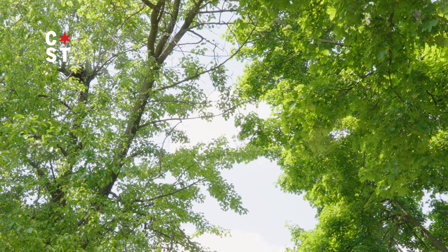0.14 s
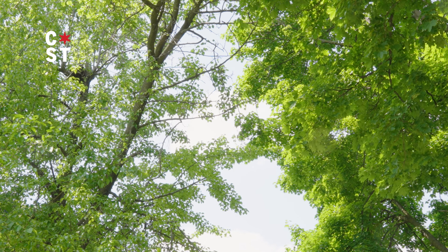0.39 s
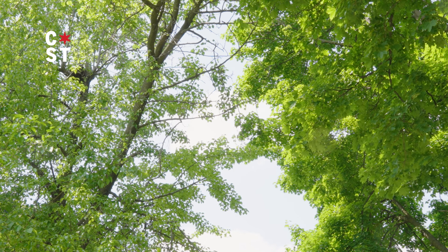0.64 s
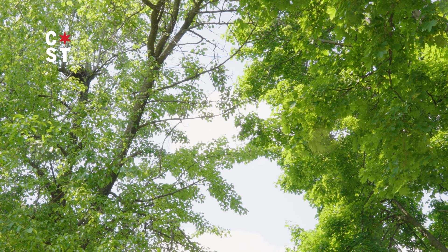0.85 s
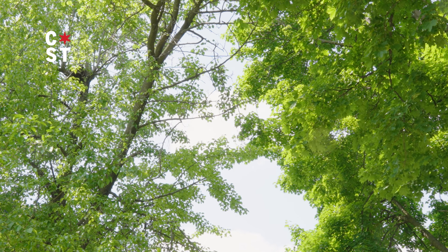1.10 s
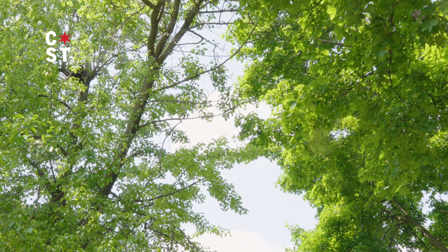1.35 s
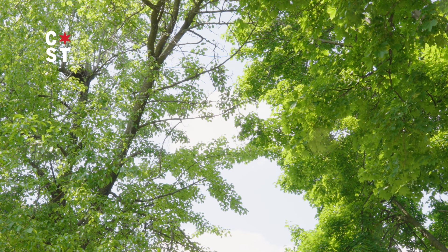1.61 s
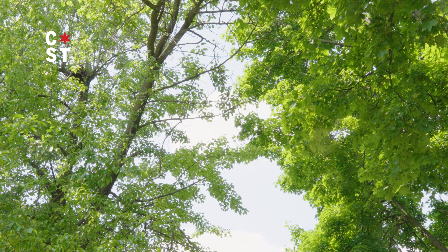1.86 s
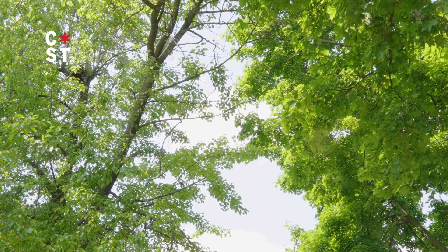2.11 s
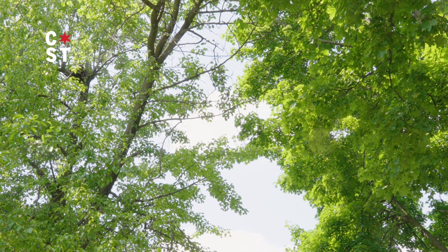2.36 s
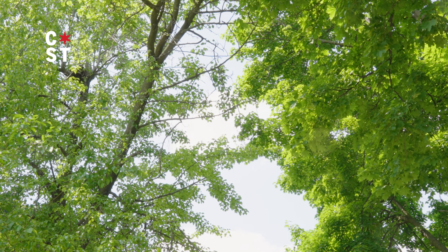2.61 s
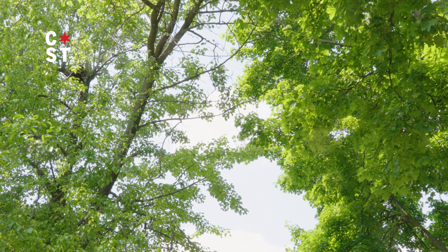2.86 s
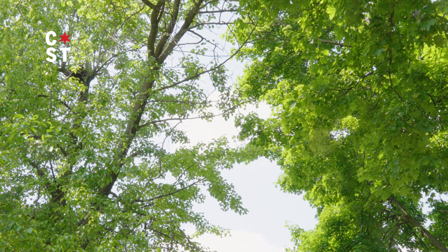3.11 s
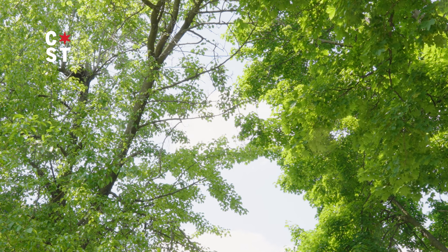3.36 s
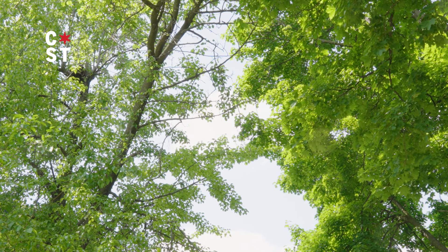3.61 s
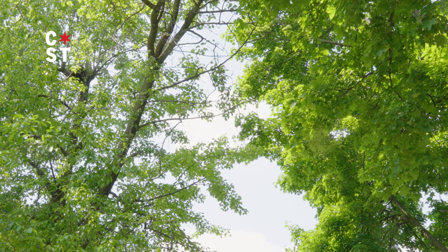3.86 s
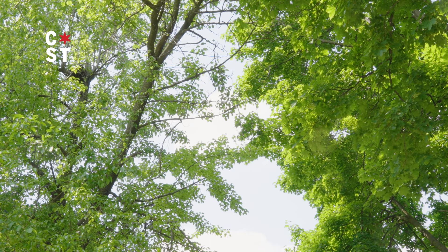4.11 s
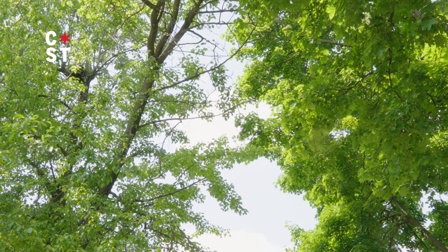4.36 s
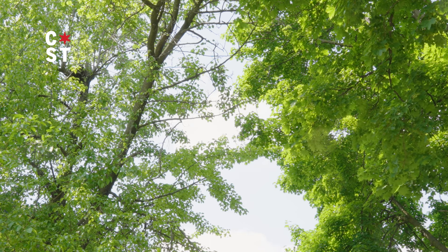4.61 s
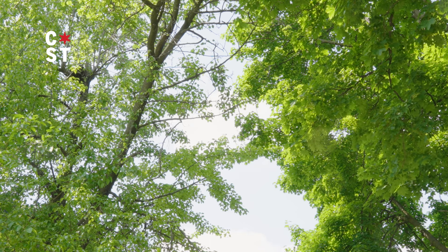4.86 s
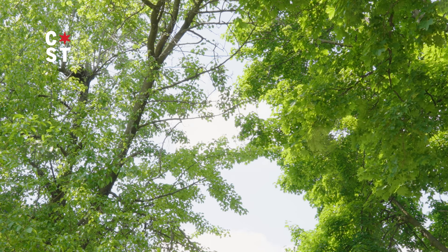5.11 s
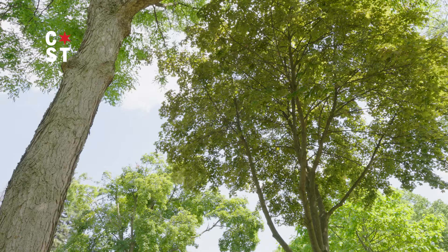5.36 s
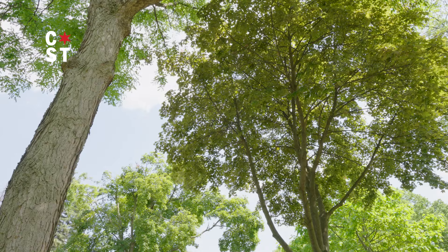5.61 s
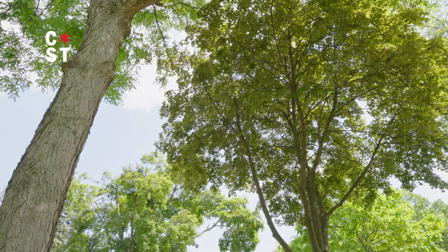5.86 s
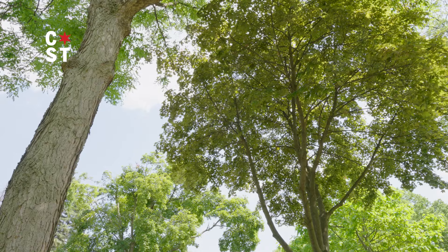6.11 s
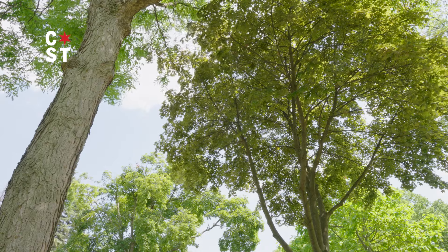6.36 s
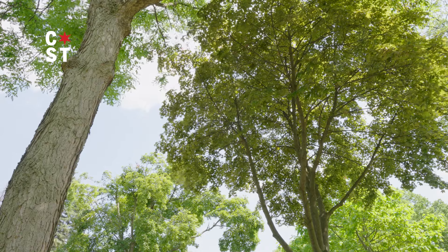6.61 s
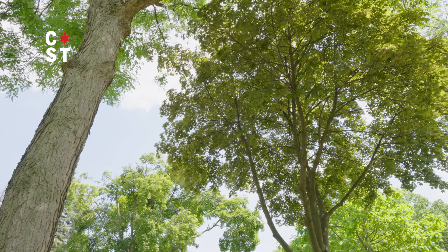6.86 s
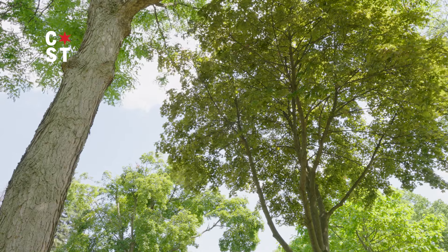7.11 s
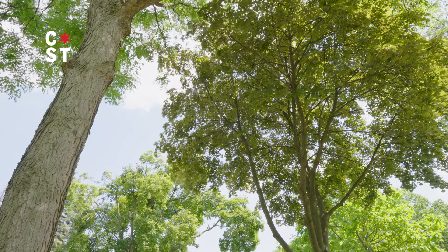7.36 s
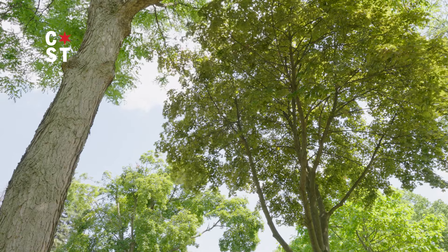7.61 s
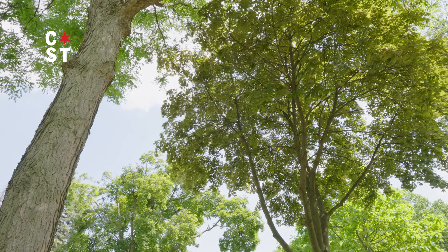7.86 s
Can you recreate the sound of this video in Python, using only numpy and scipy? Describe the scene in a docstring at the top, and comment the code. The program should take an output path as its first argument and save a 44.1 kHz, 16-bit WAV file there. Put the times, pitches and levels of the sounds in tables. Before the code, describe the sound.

A dense, high cicada chorus buzzes continuously from leafy treetops over a lower wavering whine and faint traffic, then cuts to a breezier spot with bird notes.

```python
"""Dense cicada chorus in treetops

Two spots are joined by a cut at 5.2 s, through one microphone. 144 clicking singers blur into a
swelling buzz; a second species whines lower down as narrow noise and wavering tones.
Behind are filtered-noise traffic, a hum, sine-wave engines, gliding bird notes and bright ticks.
The second spot adds low-noise gusts and soft thumps of wind on the microphone."""
import sys
import numpy as np
from scipy import signal
from scipy.fft import rfft, irfft
from scipy.io import wavfile
from scipy.ndimage import uniform_filter1d

SR = 44100
rng = np.random.default_rng(int(sys.argv[2]) if len(sys.argv) > 2 else 0)


def persist_wave(psi):
    """Save psi, clipped to +-1, as 16-bit WAV."""
    counts = np.round(np.clip(psi, -1, 1) * 32767).astype(np.int16)
    wavfile.write(sys.argv[1], SR, np.atleast_2d(counts).T)


def voltage_ratio(level):
    """Linear amplitude factor for a level in decibels (scalar or array-like)."""
    return 10 ** (np.asarray(level, float) / 20)


N = 352800
TIME_S = np.arange(N) / SR

CUT_S, FADE_OUT_S, FADE_IN_S = 5.2075, 0.00087, 0.02

# Far wash spectrum. Each row: frequency in Hz, relative density in dB per Hz.
WASH_SPECTRUM = [(18, -35), (30, -19), (55, -6.5), (100, -4.5), (200, -8.5), (300, -15.5), (1000, -19.5),
                 (1700, -25), (2600, -35.5), (5000, -50)]
# Far traffic and leaves. Each row: time in seconds, rms level at 283-1030 Hz in dB.
WASH_LEVEL = [(0, -59.2), (1, -58), (2, -56), (2.5, -55), (3, -57.5), (4.5, -60.5), (5.2, -58.5),
              (5.22, -56), (8, -54.5)]
# Hum partials. Each row: frequency in Hz, peak level in dB, rms wander in Hz.
HUM_PARTIALS = [(124.6, -61, 3), (240, -63, 0.57), (380, -70, 2.03)]
# Short drones of far engines. Each row: start and end in seconds, start and end pitch in Hz, rms level in dB.
ENGINE_DRONES = [(3.45, 3.75, 119.9, 125.7, -53), (5.55, 5.85, 132, 127, -52),
                 (5.95, 6.5, 126.8, 128.3, -54.5), (6, 7.1, 183.8, 190.3, -58), (7.7, 8, 195.7, 200, -59)]
# Passing engine. Each row: time in seconds, firing rate in Hz.
ENGINE_FIRING = [(3.66, 82.6), (3.8, 84.2), (3.9, 88.4), (4.2, 89.5), (5.2, 87)]
FIRING_DB, OCTAVE_DB, ARRIVE_S, REV_DB = -51.5, -60, 0.087, 2.5  # REV_DB adds to FIRING_DB while it revs up

# Wind noise spectrum. Each row: frequency in Hz, relative density in dB per Hz.
WIND_SPECTRUM = [(15, -30), (28, -3), (60, -1), (125, 0), (200, -6.5), (270, -13.5), (400, -25), (800, -70)]
# Gusts over the breeze. Each row: peak time in seconds, level in dB, half length to 1/e in seconds.
WIND_GUSTS = [(5.44, -47, .13), (5.77, -45, 0.11), (6.07, -47, 0.062), (6.27, -50, 0.062),
              (7.33, -45.5, .1), (7.64, -48, 0.066), (7.95, -49, 0.089)]
# Single buffets on the microphone. Each row: time in seconds, peak level in dB, frequency in Hz.
WIND_THUMPS = [(5.318, -37.5, 80), (5.426, -36, 110), (5.465, -37, 140), (5.625, -36, 140),
               (5.756, -37, 60), (6.24, -38, 90), (7.246, -33, 70), (7.268, -27, 105), (7.338, -36, 70),
               (7.616, -33, 120)]
BREEZE_DB, THUMP_HALF_S = -55, 0.01

# Small ticks close by. Each row: time in seconds, level in dB, centre in Hz, pole width in Hz,
# full length to 1/e in seconds.
CLOSE_TICKS = [(6.369, -35, 15000, 2500, .0025), (7.685, -46, 12500, 6000, .045),
               (7.916, -42, 13000, 5000, .014)]

# Distant whistles. Each row: start and end in seconds, start and end pitch in Hz, rms level in dB.
BIRD_NOTES = [(.47, .57, 2180, 2160, -66), (5.215, 5.28, 2560, 2500, -58), (5.26, 5.33, 2520, 2200, -60),
              (5.78, 5.85, 3150, 2800, -58), (5.84, 5.88, 2800, 2330, -59), (5.865, 5.925, 2340, 2280, -59),
              (6.44, 6.54, 2400, 2395, -59), (6.53, 6.61, 2405, 2400, -66), (6.522, 6.59, 2000, 1900, -58),
              (6.6, 6.645, 2850, 2700, -61), (6.64, 6.735, 2685, 2700, -55), (6.72, 6.89, 2320, 2390, -63)]
# Short arched chips. Each row: start in seconds, top pitch in Hz, rms level in dB.
BIRD_CHIPS = [(5.238, 2080, -61), (5.765, 2640, -55), (6.355, 2310, -57)]
CHIP_S, CHIP_RISE_HZ, CHIP_FALL_HZ = .055, 110, 190

# Low species as a mass. Each row: time in seconds, rms level in dB.
WHINE_LEVEL = [(0, -56.5), (.4, -58), (1.4, -52.5), (3.4, -54.5), (4.4, -58.5), (5, -55.5), (5.6, -58),
               (6.6, -55.5), (8, -54)]
# Nearer low singers. Each row: start and end in seconds, start and end pitch in Hz, rms level in dB.
WHINE_SOLOS = [(0, .95, 1348, 1355, -59), (.68, .9, 1270, 1320, -60), (1.05, 1.5, 1310, 1300, -59),
               (1.9, 3.45, 1330, 1355, -57), (3.4, 4.1, 1358, 1358, -60), (2.1, 3.5, 1295, 1275, -63),
               (.75, 3.5, 1158, 1172, -65), (0, 3.5, 1482, 1508, -68), (3.9, 4.7, 1398, 1402, -67),
               (4.62, 5.2, 1285, 1310, -62), (4.7, 5.2, 1152, 1172, -67), (5.45, 6.2, 1320, 1312, -58),
               (6.25, 6.75, 1310, 1305, -61), (6.75, 8, 1378, 1400, -59), (7.6, 8, 1310, 1290, -61)]

# Colour of one tymbal click. Each row: frequency in Hz at body size 1, relative density in dB per Hz.
CLICK_SPECTRUM = [(1180, -71), (2000, -42.5), (2820, -30.5), (3810, -10.5), (4680, -10.5), (5370, -2.5),
                  (5760, 0), (6220, -3), (7320, -18), (8400, -20.5), (9640, -33), (12000, -30.5),
                  (14700, -36.5), (15600, -36)]
# Chorus effort, one list a spot. Each row: time in seconds, level in dB.
CHORUS_EFFORT = [
    [(0, -25), (.3, -26.5), (.7, -27), (1.05, -25.5), (1.55, -26), (2.2, -24), (2.65, -22.2), (3.35, -22),
     (3.7, -21), (4.0, -21.4), (4.6, -24.5), (5.2, -27.5)],
    [(5.23, -23.5), (5.6, -23), (5.82, -24.5), (6.15, -22.5), (6.5, -23), (7.0, -23), (7.6, -23.5),
     (8, -25)],
]
# Low shoulder at the usual effort. Each row: time in seconds, lift in dB.
SHOULDER_LIFT = [(0, -1), (.9, -1.5), (1.3, -2.5), (2.3, -1), (3.2, -1.8), (4.5, -1), (5.2, -1.5),
                 (5.22, .5), (6.5, 1), (7.1, -1), (8, -1)]
# High sheen at the usual effort. One value a spot: lift in dB.
SHEEN_LIFT_DB = (-.2, -1.1)
USUAL_EFFORT_DB = -24
SHOULDER_LAG, SHEEN_LAG = 0.46, .1  # share of each swell not followed


def evened(x):
    """Scales to rms 1."""
    return x / np.sqrt(np.mean(abs(x) ** 2) + 1e-20)


def read_spectrum(points, hz):
    """Reads a spectrum in dB on a log-frequency axis."""
    points_hz, points_db = np.transpose(points)
    return np.interp(np.log(hz + 1), np.log(points_hz + 1), points_db)


def curve(rows, t_s=TIME_S):
    """Interpolates a two-column table at the given times."""
    rows_s, values = np.transpose(rows)
    return np.interp(t_s, rows_s, values)


def drift(seconds):
    """Slow random curve of rms 1: noise averaged twice over the given span."""
    size = max(int(seconds * SR), 2)
    once = uniform_filter1d(rng.standard_normal(N), size, mode="wrap")
    return evened(uniform_filter1d(once, size, mode="wrap"))


def coloured(x, points):
    """Filters x by a fixed spectrum."""
    gain = voltage_ratio(read_spectrum(points, np.fft.rfftfreq(N, 1 / SR)))
    return irfft(rfft(x) * gain, N)


def band_rms(x, lo_hz, hi_hz):
    """Rms of one frequency band."""
    z = rfft(x)[int(lo_hz * N / SR):int(hi_hz * N / SR)]
    return np.sqrt(2 * np.sum(abs(z) ** 2)) / N


def resonant_noise(centre_hz, pole_width_hz):
    """Noise of rms 1 through a two-pole-deep resonance: shift to 0 Hz, smooth twice, shift back."""
    carrier = np.exp(2j * np.pi * centre_hz * TIME_S)
    r = np.exp(-np.pi * pole_width_hz / SR)
    once = signal.lfilter([1 - r], [1, -r], rng.standard_normal(N) / carrier)
    twice = signal.lfilter([1 - r], [1, -r], once)
    return evened((carrier * twice).real)


def glides(rows, fuzz_hz, ramps_s, waver_db):
    """Sines gliding along a few pitches with random pitch and level; ramps_s totals both end ramps."""
    out = np.zeros(N)
    for start_s, end_s, *path_hz, db in rows:
        a = int(start_s * SR)
        n = int((min(end_s, N / SR) - start_s) * SR)
        path = np.interp(np.linspace(0, 1, n), np.linspace(0, 1, len(path_hz)), path_hz)
        hz = path + fuzz_hz * drift(.012)[:n]
        level = voltage_ratio(db + waver_db * drift(0.048)[:n])
        tone = np.sqrt(2) * np.sin(2 * np.pi * np.cumsum(hz) / SR)
        out[a:a + n] += level * tone * signal.windows.tukey(n, min(ramps_s * SR / n, 1))
    return out


def traffic():
    """Far traffic and leaves: spectrum-shaped noise with a slow level curve."""
    wash = coloured(rng.standard_normal(N), WASH_SPECTRUM)
    return voltage_ratio(curve(WASH_LEVEL)) * wash / band_rms(wash, 283, 1030)


def hum():
    """Low sines that each waver in pitch and level."""
    out = np.zeros(N)
    for hz, db, wander_hz in HUM_PARTIALS:
        level = voltage_ratio(db + 2.4 * drift(0.14))
        out += level * np.sin(2 * np.pi * np.cumsum(hz + wander_hz * drift(0.103)) / SR)
    return out


def engines():
    """Short far drones, and a passing engine as firing rate plus octave, cut off with the first spot."""
    phase = 2 * np.pi * np.cumsum(curve(ENGINE_FIRING)) / SR
    arrival = np.clip((TIME_S - ENGINE_FIRING[0][0]) / ARRIVE_S, 0, 1)
    envelope = arrival * (TIME_S < CUT_S) * voltage_ratio(1.1 * drift(.05))
    rev_db = REV_DB * np.clip((ENGINE_FIRING[-2][0] - TIME_S) / .1, 0, 1)
    orders = voltage_ratio(FIRING_DB + rev_db) * np.sin(phase) + voltage_ratio(OCTAVE_DB) * np.sin(2 * phase)
    return glides(ENGINE_DRONES, 1.4, .15, 1.4) + envelope * np.sqrt(2) * orders


def wind():
    """Wind on the microphone at the second spot: low noise in gusts, and short low-tone thumps."""
    blow = voltage_ratio(BREEZE_DB)
    for peak_s, db, half_s in WIND_GUSTS:
        blow = blow + voltage_ratio(db) * np.exp(-((TIME_S - peak_s) / half_s) ** 2)
    out = evened(coloured(rng.standard_normal(N), WIND_SPECTRUM)) * blow * (TIME_S > CUT_S)
    for peak_s, db, hz in WIND_THUMPS:
        since_s = TIME_S - peak_s
        out += voltage_ratio(db) * np.cos(2 * np.pi * hz * since_s) * np.exp(-(since_s / THUMP_HALF_S) ** 2)
    return out


def ticks():
    """Short bright puffs of resonant noise under bell-shaped envelopes."""
    out = np.zeros(N)
    for peak_s, db, hz, width_hz, length_s in CLOSE_TICKS:
        envelope = np.exp(-((TIME_S - peak_s) / length_s * 2) ** 2)
        out += voltage_ratio(db) * resonant_noise(hz, width_hz) * envelope
    return out


def birds():
    """Far gliding whistles and arched chips, smeared by decaying-noise echoes off the trunks."""
    chips = [(s, s + CHIP_S, top_hz - CHIP_RISE_HZ, top_hz, top_hz - CHIP_FALL_HZ, db)
             for s, top_hz, db in BIRD_CHIPS]
    notes = glides(BIRD_NOTES + chips, 9, .035, 1.2)
    t_s = np.arange(6000) / SR
    echoes = rng.standard_normal(6000) * voltage_ratio(-60 * t_s / 0.2)
    echoes /= np.linalg.norm(echoes)
    return notes + voltage_ratio(-9) * signal.oaconvolve(notes, echoes)[:N]


def whine():
    """The low species: a resonant noise band for far singers, wavering tones for nearer ones."""
    mass = resonant_noise(1311, 224)
    return voltage_ratio(curve(WHINE_LEVEL)) * mass + glides(WHINE_SOLOS, 6, .2, 1.4)


def singer_clicks():
    """One singer: clicks of random sign at an uneven rate, with a swell of its own."""
    clicks = np.zeros(N)
    gaps = SR / rng.uniform(180, 360) * (1 + .25 * rng.uniform(-1, 1, 4000))  # nominal clicks/s
    at = np.cumsum(gaps).astype(int)
    at = at[at < N]
    coarse = np.arange(0, N, 441)  # 10 ms steps
    swell = evened(uniform_filter1d(rng.standard_normal(len(coarse)), size=8))
    clicks[at] = voltage_ratio(2.6 * np.interp(at, coarse, swell)) * rng.choice([-1., 1.], len(at))
    return clicks


def leaf_scatter():
    """Leaves scatter clicks into a short tail: a decaying-noise response with flat magnitude."""
    leaves = rng.standard_normal(2000) * voltage_ratio(-60 * np.arange(2000) / SR / .03)
    scatter = rfft(leaves, N)
    return scatter / abs(scatter)


def swelling(buzz):
    """Applies the effort curve; the low shoulder and high sheen follow each swell only in part."""
    hz, t_s, z = signal.stft(buzz, SR, nperseg=256, noverlap=192)
    effort_db = curve(np.vstack(CHORUS_EFFORT), t_s)
    excess_db = effort_db - USUAL_EFFORT_DB
    shoulder_db = curve(SHOULDER_LIFT, t_s) - SHOULDER_LAG * excess_db
    sheen_db = np.take(SHEEN_LIFT_DB, (t_s > CUT_S).astype(int)) - SHEEN_LAG * excess_db
    low_db = np.interp(hz, [4400, 5200], [1, 0])[:, None] * shoulder_db
    high_db = np.interp(hz, [7000, 9500], [0, 1])[:, None] * sheen_db
    z = z * voltage_ratio(effort_db + low_db + high_db)
    return signal.istft(z, SR, nperseg=256, noverlap=192)[1][:N]


def chorus(groups=12, singers=12):
    """Singers click in groups; each group's body size shifts the click colour and leaves scatter it."""
    hz, spectrum = np.fft.rfftfreq(N, 1 / SR), 0
    for size in 1 + 0.034 * np.linspace(-1, 1, groups):
        clicks = sum(singer_clicks() for _ in range(singers))
        colour = voltage_ratio(read_spectrum(CLICK_SPECTRUM, hz * size))
        spectrum = spectrum + rfft(clicks) * leaf_scatter() * colour
    buzz = irfft(spectrum, N)
    return swelling(buzz / band_rms(buzz, 5005, 7000))


def scene():
    """Sums all sources; one microphone feeds both channels."""
    mono = traffic() + hum() + engines() + wind() + ticks() + birds() + whine() + chorus()
    return np.array([mono, mono])


def roll_off(x):
    """The treble ends steeply here."""
    return signal.sosfilt(signal.butter(12, 15750, fs=SR, output="sos"), x)


def record(dry):
    """Joins the spots: a fast fade-out before the cut, a slower fade-in after it."""
    after_s = TIME_S - CUT_S
    fades = np.clip(np.where(after_s < 0, -after_s / FADE_OUT_S, after_s / FADE_IN_S), 0, 1)
    return roll_off(dry * fades)


dry = scene()
out = record(dry)
persist_wave(out)
```